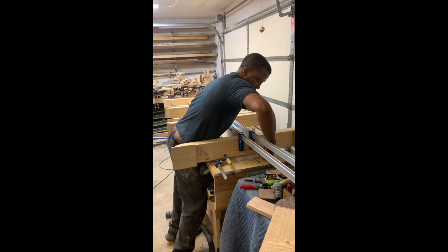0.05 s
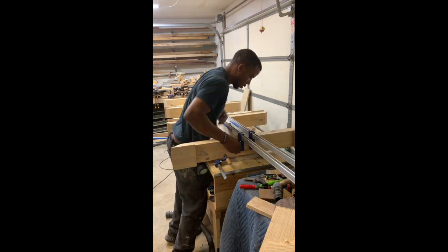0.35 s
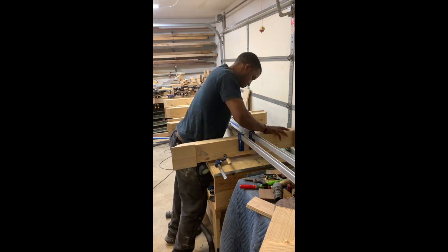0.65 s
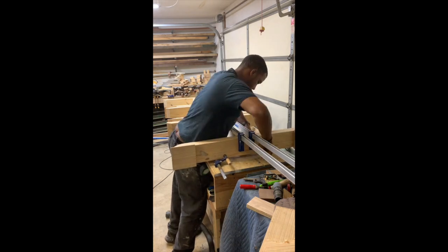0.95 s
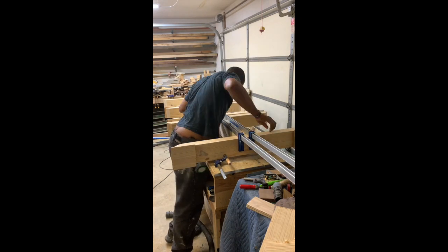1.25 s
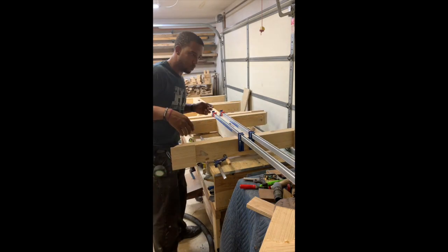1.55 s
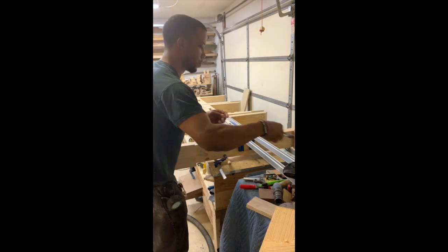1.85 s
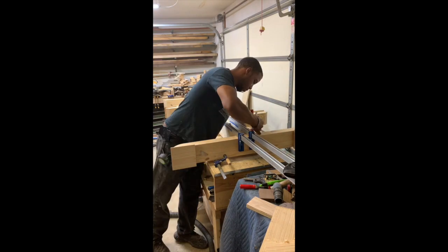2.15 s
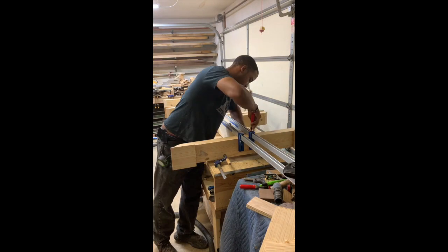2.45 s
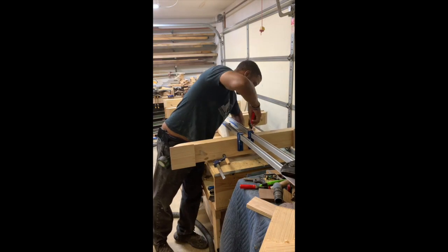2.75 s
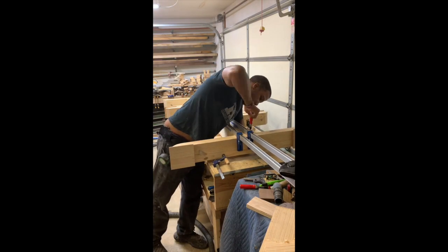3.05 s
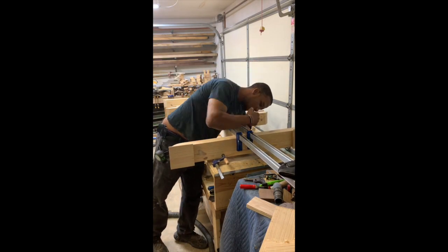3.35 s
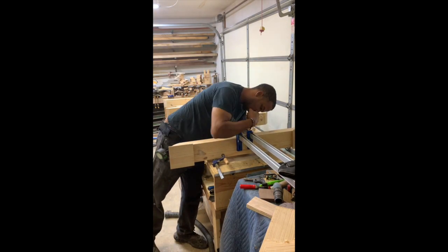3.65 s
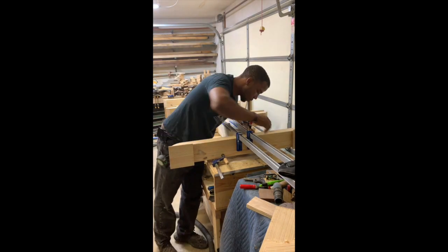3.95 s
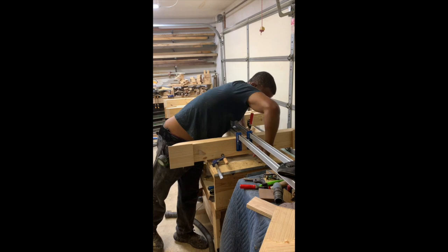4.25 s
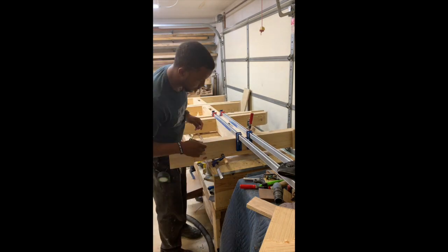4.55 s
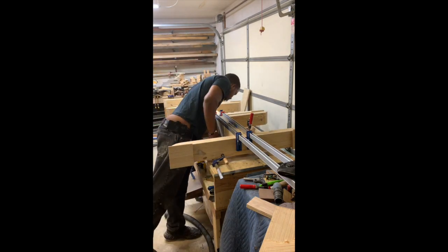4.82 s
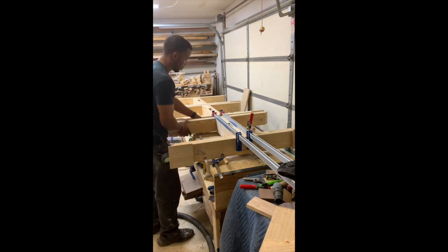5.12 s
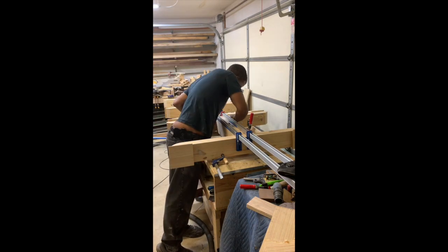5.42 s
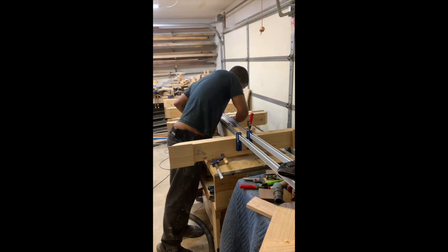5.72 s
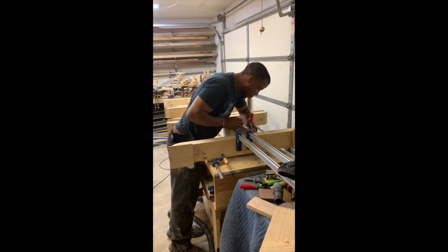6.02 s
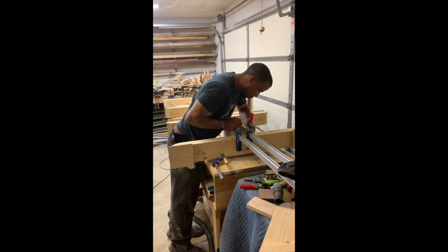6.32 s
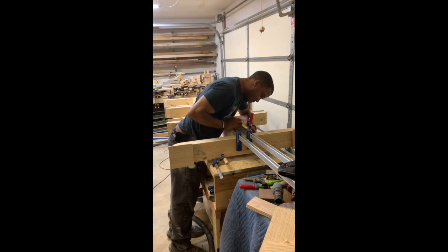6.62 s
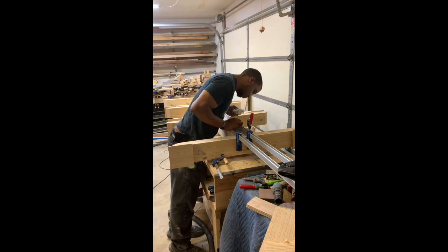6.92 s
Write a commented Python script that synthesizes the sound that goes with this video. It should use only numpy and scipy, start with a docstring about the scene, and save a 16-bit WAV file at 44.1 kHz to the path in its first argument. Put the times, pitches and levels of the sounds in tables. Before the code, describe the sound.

Bar clamps are worked on a wooden frame in a garage, heard from a fixed, nearly mono microphone over faint room air and a distant machine whine. A brief high screw squeal ends in a clack right at the start. A short scrape comes at 0.5 seconds, then scattered clinks and ticks. Around 1.8 seconds a jaw rattles, skids along its bar and bangs loudly onto the wood. Another sharp metal clack lands at 2.4 seconds. From there until 4.4, loaded threads creak and tick in short turns among ringing clicks. At 4.5 a dry screw squeals in rising strokes for about half a second, then sings in soft, broken squeaks until around 6, with a small scrape and knock at 5.4. Lighter clinks, faint squeaks and soft wooden taps continue to the end at about 7 seconds.

```python
"""A garage workshop, where bar clamps are hurriedly set and tightened on a wooden frame.
Jaws, bars and handles strike and ring, and a jaw skids along its bar and bangs onto the wood.
Loaded threads creak and tick; a dry screw sticks and slips, squealing hard or singing softly.
A machine whines faintly in the distance. The microphone stays in one spot, nearly mono."""
import sys
import numpy as np
from scipy import signal
from scipy.fft import rfft, irfft
from scipy.io import wavfile

SR = 44100
rng = np.random.default_rng(int(sys.argv[2]) if len(sys.argv) > 2 else 0)


def int16_out(signal):
    """Quantize to a 16-bit WAV file."""
    q = np.round(np.clip(np.atleast_2d(signal).T, -1, 1) * 32767)
    wavfile.write(sys.argv[1], SR, q.astype(np.int16))


N = 316638
TIME = np.arange(N) / SR
HIT_TIME = np.arange(SR // 16) / SR
SIDE = np.array([[1], [-1]])   # adds on the left, subtracts on the right


def from_db(db):
    """Decibels to gain."""
    return 10 ** (np.asarray(db) / 20)


def rms_one(x):
    """Scale to unit rms."""
    return x / np.sqrt(np.mean(x ** 2) + 1e-30)


def one_ms(x):
    """Scale to the energy of one millisecond at unit rms: the reference for a hit's level."""
    return x * np.sqrt(SR / 1000 / (np.sum(x ** 2) + 1e-30))


def curve(points, at=TIME):
    """Follow straight lines between (seconds, value) points."""
    return np.interp(at, *np.transpose(points))


def drift(per_s):
    """A random wander of unit rms."""
    knots = rng.standard_normal(int(N / SR * per_s) + 2)
    return rms_one(np.interp(TIME * per_s, np.arange(len(knots)), knots))


def gate(start, end, edge_s):
    """Attack, hold, release."""
    return np.clip(np.minimum(TIME - start, end - TIME) / edge_s, 0, 1)


def coloured(x, spectrum):
    """Give noise a spectrum of (Hz, dB) points."""
    hz, level_db = np.transpose(spectrum)
    bins = np.maximum(np.fft.rfftfreq(len(x), 1 / SR), 1)
    return irfft(rfft(x) * from_db(np.interp(np.log(bins), np.log(hz), level_db)), len(x))


def resonate(x, hz, width):
    """A resonance applied twice, so that its skirts are steep."""
    r = np.exp(-np.pi * width / SR)
    b = np.array([1, 0, -1]) * (1 - r * r) / 2
    a = [1, -2 * r * np.cos(2 * np.pi * hz / SR), r * r]
    return signal.lfilter(b, a, signal.lfilter(b, a, x + 1e-18))


def noisy_modes(modes, drive=1):
    """Ring each (Hz, width in Hz, dB) mode with its own noise, shaped by the drive."""
    return sum(from_db(db) * rms_one(resonate(drive * rng.standard_normal(N), hz, width))
               for hz, width, db in modes)


def add(track, s, sound):
    """Mix a sound into a track at a time."""
    start = int(max(s, 0) * SR)
    part = sound[:N - start]
    track[start:start + len(part)] += part


# Room tone around the microphone. Each row: frequency in Hz, relative density in dB.
AIR_SPECTRUM = [(30, -42.5), (100, -29.5), (250, -19), (400, -18), (520, -15), (620, -9.5), (760, -12.5),
                (900, -11.5), (1120, 6.5), (1550, -7.5), (2120, -4), (2700, -11.5), (5000, -22.5),
                (12000, -26.5)]
# Its rise and fall. Each row: time in seconds, level in dB before the trim.
AIR_LEVEL = [(0, -53), (.3, -60.5), (.85, -60.5), (1.5, -65), (1.9, -61.8), (4.2, -61), (4.7, -58),
             (5.1, -60.5), (5.95, -59.3), (6.15, -63), (6.8, -63.8), (7.18, -67.5)]
# The machine in the distance. Each row: resonance in Hz, width in Hz, level in dB before the trim.
MACHINE_MODES = [(428, 10, -88), (527.3, 78, -78.5), (754.3, 21, -78), (837.7, 30, -80), (1095, 76, -65),
                 (1185, 13, -60.5), (2074, 110, -64.5), (2355, 57, -69.5), (3060, 60, -79.5)]


def background(air_trim_db=-1.5, machine_trim_db=-3):
    """Room air and a distant machine's whine swell and sink together; the bass is a little wider."""
    level_db = curve(AIR_LEVEL)
    mid, side = (rms_one(coloured(rng.standard_normal(N), AIR_SPECTRUM)) for _ in range(2))
    side = coloured(side, [(250, -15), (700, -26)])
    air = from_db(level_db + air_trim_db) * (mid + side * SIDE)
    swell = from_db(level_db - np.median(level_db) + machine_trim_db)
    return air + swell * noisy_modes(MACHINE_MODES)


# What the garage throws back at the microphone. Each row: frequency in Hz, relative level in dB.
REFLECTION_SPECTRUM = [(100, -6.5), (1000, 0.5), (2000, 3.5), (5000, -0.5), (8000, -1.5), (12000, 1.5)]


def garage(direct, early_db=-16, early_t60_s=.07, late_db=-25, late_t60_s=.54, side_db=-18):
    """The direct sound, quick reflections off bench and timber, then a faint tail from the walls."""
    t = np.arange(SR) / SR
    onset = np.clip((t - .003) / .011, 0, 1)
    reflections = []
    for _ in range(2):
        response = 0
        for db, t60 in ((early_db, early_t60_s), (late_db, late_t60_s)):
            tail = coloured(rng.standard_normal(SR), REFLECTION_SPECTRUM)
            tail *= onset * from_db(-60 * t / t60)
            response += from_db(db) * tail / np.linalg.norm(tail)
        reflections.append(signal.fftconvolve(direct, response)[:N])
    mid, side = reflections
    return direct + mid + from_db(side_db) * side * SIDE


def catches(per_s, spread_db, max_spreads):
    """Friction catches and lets go at random: a train of uneven impulses."""
    caught = rng.random(N) < per_s / SR
    return caught * from_db(spread_db * np.minimum(rng.exponential(1, N), max_spreads))


def contact(chatter_ms, rise_ms, bite, grain_db=2.5):
    """A contact bites within a moment, then dies in a spray of tiny rebounds."""
    noise, size = rng.standard_normal((2, len(HIT_TIME)))
    ms = HIT_TIME * 1000
    envelope = (1 - np.exp(-ms / rise_ms)) * np.exp(-(ms / max(chatter_ms, .3)) ** .94)
    force = noise * from_db(grain_db * np.clip(size, -2, 2)) * envelope
    force[0] += bite
    return force


# The metal of a clamp on the bench. Each row: resonance in Hz, width in Hz, relative level in dB.
CLAMP_MODES = [(2101, 340, -0.5), (2348, 480, -7), (2889, 500, -3), (3767, 380, -4.5), (4230, 550, -2),
               (4670, 510, 1), (5136, 240, -0.5), (5480, 310, -2), (6055, 690, 0.5), (6676, 570, -2.5),
               (7754, 600, -3), (9536, 600, -1.5), (9950, 470, 1.5), (10700, 1000, 2), (11450, 600, -6)]


def rubbed_clamp(per_s, spread_db, tilt_db_per_octave, widen):
    """Tiny catches of metal on metal, each ringing the clamp; unit rms."""
    modes = [(hz, width * widen, db + tilt_db_per_octave * np.log2(hz / 5000))
             for hz, width, db in CLAMP_MODES]
    return rms_one(noisy_modes(modes, catches(per_s, spread_db, max_spreads=4)))


def struck_clamp(hits, bite=.9, mode_floor=1, ring_width_hz=330, rise_share=.2):
    """Each spot has its own ring; hard edges add treble, heavy blows the bar's low modes."""
    out = np.zeros(N)
    hz, width, mode_db = np.transpose(CLAMP_MODES)
    body, edge = hz < 3400, hz > 8600
    for s, db, body_db, edge_db, ring_hz, share, chatter_ms in hits:
        force = contact(1.05 * chatter_ms, rise_share * max(chatter_ms, .3), bite)
        near_ring = mode_floor + np.exp(-((hz - ring_hz) / 1100) ** 2)
        gains = near_ring * from_db(mode_db + rng.normal(0, 4, len(hz))) * rng.choice([-1, 1], len(hz))
        modes = np.array([g * one_ms(resonate(force, f, w)) for f, w, g in zip(hz, width, gains)])
        ring = np.sqrt(share) * one_ms(resonate(force, ring_hz, ring_width_hz))
        middle = np.sqrt(1 - share) * one_ms(modes[~body & ~edge].sum(0))
        low = from_db(body_db) * one_ms(modes[body].sum(0))
        high = from_db(edge_db) * one_ms(modes[edge].sum(0))
        add(out, s - .0006, from_db(db) * (low + one_ms(ring + middle) + high))
    return out


# Play in handles and bars, faint at the microphone. Each row: time in seconds, level in dB before trims.
LOOSE_PLAY = [(0, -47.5), (.32, -64.5), (.58, -58.5), (.9, -63.5), (1.3, -69.5), (2.05, -63), (3.3, -66),
              (3.95, -75.5), (4.25, -57), (4.55, -73), (5.07, -63), (5.3, -65.5), (5.82, -57),
              (6.15, -67.5), (6.55, -60), (7.05, -69)]


def loose_rustle(trim_db=-4.5):
    """Loose parts rub softly all through the work."""
    rub = rubbed_clamp(per_s=600, spread_db=.5, tilt_db_per_octave=-6.5, widen=.9)
    return from_db(curve(LOOSE_PLAY) + trim_db) * rub


def loose_hits(count=22, trim_db=5, spread_db=2.5, body_db=-10, edge_db=-1, share=.4, chatter_ms=2.5):
    """Hits for struck_clamp: loose parts touch at random, as hard as their play allows."""
    place, size, spot = rng.random((count, 3)).T
    starts = (np.arange(count) + place) / count * (N - 1) / SR
    levels = curve(LOOSE_PLAY, starts) + trim_db + spread_db * (2 * size - 1)
    rings_hz = 5000 * 2 ** ((spot - .5) / 2)
    return [(s, db, body_db, edge_db, hz, share, chatter_ms)
            for s, db, hz in zip(starts, levels, rings_hz)]


# Turns of a handle. Each row: start and end in seconds, level in dB before the trim.
HANDLE_TURNS = [(.85, 0.952, -56), (1.06, 1.23, -59), (2.423, 2.593, -60.5), (2.807, 2.97, -54),
                (3.103, 3.433, -53), (3.49, 3.85, -51.5), (4.104, 4.408, -53.5)]


def thread_creak(trim_db=-6.5, ease_s=.053, lurch_db=4):
    """Each turn takes up the load, moves in fits and lets off; uneven slips ring the screw."""
    screw_modes = [(2076, 220, -11), (4654, 300, -1.5), (5560, 260, -3.5),
                   (6065, 320, -7), (7980, 320, -13)]
    slips = catches(per_s=280, spread_db=4, max_spreads=3)
    load = sum(from_db(db + trim_db) * gate(start - ease_s / 2, end + ease_s / 2, ease_s)
               for start, end, db in HANDLE_TURNS)
    return load * from_db(lurch_db * drift(30)) * rms_one(noisy_modes(screw_modes, slips))


# Faint squeaks of the thread. Each row: start and end in seconds, first and last pitch in Hz, level in dB.
THREAD_SQUEAKS = [(1.318, 1.332, 3150, 3155, -51), (1.334, 1.358, 3100, 3180, -56),
                  (4.57, 4.661, 3950, 4270, -57.5), (4.631, 4.756, 4085, 4650, -56),
                  (4.658, 4.74, 5100, 5250, -62.5), (4.758, 4.873, 3610, 3960, -63),
                  (4.767, 4.839, 5420, 5530, -64.5), (4.769, 4.852, 3030, 3070, -78),
                  (5.737, 5.967, 3050, 3060, -69), (6.06, 6.092, 3010, 3100, -62)]


def thread_squeaks(jitter=.003, flutter_db=3):
    """Higher modes of the screw catch briefly and glide up as the pressure grows."""
    out = np.zeros(N)
    wobble = 1 + jitter * drift(400)
    flutter = from_db(flutter_db * drift(150))
    for start, end, start_hz, end_hz, db in THREAD_SQUEAKS:
        now = (TIME > start) & (TIME < end)
        along = (TIME[now] - start) / (end - start)
        hz = (start_hz + (end_hz - start_hz) * along) * wobble[now]
        tone = np.sqrt(2) * np.sin(2 * np.pi * np.cumsum(hz) / SR)
        out[now] += from_db(db) * np.sin(np.pi * along) * flutter[now] * tone
    return out


def stick_slip(hz, level, octave, jitter=.0041, flutter_db=1.64, rasp_db=-17.5):
    """Stick and slip lock into a thin tone with a fitful octave; uneven slips roughen it."""
    phase = 2 * np.pi * np.cumsum(hz * (1 + jitter * drift(220))) / SR
    fitful_octave = octave * from_db(3.5 * drift(45) - 2.5)
    tone = 0
    for harmonic, gain in ((1, level), (2, fitful_octave)):
        rasp = from_db(rasp_db) * harmonic ** 2 * (drift(330) + 1j * drift(330))
        tone += gain * np.real((1 + rasp) * np.exp(1j * harmonic * phase))
    return np.sqrt(2) * tone * from_db(flutter_db * drift(70) - 1.5)


def bar_buzz(level):
    """The squeal's friction also shakes the bar's lowest mode and its overtones."""
    friction = rng.standard_normal(N)
    return level * sum(from_db(db) * rms_one(resonate(friction, hz, width))
                       for hz, width, db in ((2120, 107, -12), (4410, 800, -29)))


# Hard strokes of the dry screw. Each row: start and end in seconds, first and last pitch in Hz
# before the sag, drive in dB, octave in relative dB.
HARD_STROKES = [(-.01, .088, 2185, 2130, -26.5, -28), (4.507, 4.656, 2122, 2690, -36.5, -17),
                (4.648, 4.887, 2130, 2451, -33.3, -19), (4.876, 4.936, 2110, 2150, -37, -27)]
# Gentle nudges. Each row: centre and half length in seconds, drive in dB, octave in relative dB.
GENTLE_NUDGES = [(3.292, 0.055, -56, -16), (4.941, .02, -50, -22.5), (5.098, 0.047, -49, -22.5),
                 (5.255, .04, -51, -22), (5.364, .04, -41, -24), (5.451, .03, -46.5, -5),
                 (5.551, .035, -50.5, -10), (5.68, 0.051, -41, -15), (5.82, 0.042, -58, 6),
                 (5.922, 0.077, -46.5, -18.5), (6.29, .04, -61, -14), (6.51, .1, -57, -10)]
# The note the nudges draw from the screw. Each row: time in seconds, pitch in Hz.
SINGING_PITCH = [(3.3, 2078), (4.95, 2139), (5.25, 2166), (5.47, 2216), (5.68, 2278), (5.83, 2313),
                 (5.92, 2270), (6.03, 2177), (6.3, 2115), (6.8, 2050)]


def dry_screw(choke_db=7, octave_growth_db=9.5, sag_s=.016, sag_share=.0904, flicker_db=2.4):
    """Hard strokes squeal and choke as pressure builds; gentle nudges swell into a soft singing."""
    hz = curve(SINGING_PITCH)
    level, octave = np.zeros((2, N))
    for start, end, start_hz, end_hz, db, octave_db in HARD_STROKES:
        along = np.clip((TIME - start) / (end - start), 0, 1)
        stroke = from_db(db - choke_db * along ** 4) * gate(start, end, edge_s=.012)
        glide = start_hz + (end_hz - start_hz) * along
        sag = 1 - sag_share * np.clip(1 - (end - TIME) / sag_s, 0, 1)   # the hand lets go
        hz = np.where(stroke > level, glide * sag, hz)
        level = np.maximum(level, stroke)
        octave += from_db(octave_db + octave_growth_db * (along - .5)) * stroke
    flicker = from_db(flicker_db * drift(45))   # under a light load the tone keeps half breaking off
    for s, half_s, db, octave_db in GENTLE_NUDGES:
        swell = flicker * from_db(db) * np.exp(-np.minimum(((TIME - s) / half_s) ** 2, 20))
        level += swell
        octave += from_db(octave_db) * swell
    return stick_slip(hz, level, octave) + bar_buzz(level)


# A loaded thread jumping forward. Each row: start in seconds, level in dB, bar body in relative dB,
# ring in Hz, that ring's share from 0 to 1.
THREAD_JUMPS = [(0.934, -33, -18, 4740, 0.9), (1.064, -42.5, -8, 5300, 0.7), (1.132, -34.5, -22, 5390, 1),
                (1.1887, -22, -35, 5350, 0.96), (1.2, -38, -16, 5390, 0.9), (1.2329, -41, -18, 5280, .85),
                (2.4585, -37.5, 2.5, 5000, .2), (2.516, -42.5, 8, 5300, .45), (2.5297, -35.5, -5, 5300, .5),
                (2.546, -37.5, -4, 5130, .1), (2.553, -32, -23, 3880, .8), (2.567, -33.5, -11, 4290, 0.4),
                (2.589, -43, -10, 5480, 1), (2.6854, -36, -4, 5020, 0.2), (2.726, -46, -1, 4400, 0.25),
                (2.8938, -36, -16, 5460, 0.93), (2.9073, -43, -6, 5530, .65), (2.928, -45, -17, 4080, .5),
                (3.1197, -37.5, -9.5, 5720, .55), (3.1362, -43, 0, 5680, .7), (3.1887, -37.5, -5, 5660, .7),
                (3.243, -46, 3.5, 5320, 0.4), (3.275, -40.5, -13.5, 4670, .5), (3.3026, -40, 0, 5800, .35),
                (3.311, -33, -7, 4540, 0.58), (3.3525, -41, -9, 4620, .4), (3.4131, -37, -15, 4600, .6),
                (3.5074, -26, -23, 4640, 0.45), (3.535, -31, -23, 4700, 0.1), (3.6063, -30, -35, 4450, .4),
                (3.6207, -39, -14, 4460, .75), (3.698, -30, -28, 4640, .5), (3.7035, -25, -31, 5640, 0.1),
                (3.742, -41, -19, 4600, .5), (3.7895, -27, -21, 4610, 0.38), (3.8432, -26, -35, 4580, 0.47),
                (4.1012, -32.5, -23, 5050, 0.53), (4.1328, -35, -24, 5080, 0.8),
                (4.167, -31.5, -32, 5380, .5), (4.2385, -35, -14, 5640, 0.4), (4.2714, -37, -11, 5160, 0.8),
                (4.3102, -41, -16, 7520, 0.23), (5.187, -38, -10, 5250, .65)]


def thread_ticks(edge_db=-57, chatter_ms=1.9):
    """Short jumps start softly and ring the clamp; their faint hard edge does not grow with size."""
    hits = [(s, db, body_db, edge_db - db, hz, share, chatter_ms)
            for s, db, body_db, hz, share in THREAD_JUMPS]
    return struck_clamp(hits, bite=.3, mode_floor=.8, ring_width_hz=260, rise_share=.5)


# Skids along a bar. Each row: fastest moment in seconds, level in dB, seconds to rise and to fall 20 dB.
JAW_SKIDS = [(.089, -35.5, 0.03, 0.0238), (.471, -32, .019, .033), (1.72, -41, 0.0356, 0.03),
             (1.81, -25, .04, 0.0456), (1.88, -49.5, 0.08, 0.1), (5.408, -41.5, .012, 0.0369)]


def jaw_skids():
    """A jaw gathers speed and stops, scraping all the clamp's resonances."""
    speed = 0
    for s, db, rise_s, fall_s in JAW_SKIDS:
        drop_db = 20 * np.maximum((s - TIME) / rise_s, (TIME - s) / fall_s).clip(0, 10)
        speed += from_db(db - drop_db)
    return speed * rubbed_clamp(per_s=1100, spread_db=1, tilt_db_per_octave=1.5, widen=2.9)


# The wooden frame. Each row: resonance in Hz, width in Hz, relative level in dB.
FRAME_MODES = [(825, 140, 1.5), (1189, 150, 4.5), (1262, 120, 1)]
# Blows that reach it. Each row: start in seconds, wood level in dB, lowest mode in relative dB,
# bench thump in dB.
FRAME_BLOWS = [(0.09, -27, -33, -75), (0.454, -67, -6, -66), (.472, -45, -5, -64), (1.713, -47, -8, -66),
               (1.795, -29, -5, -51), (1.8048, -28, -1, -32.5), (1.8175, -14.5, -3.5, -44),
               (1.925, -49.5, 3, -64), (2.047, -53.5, -4, -64), (2.807, -37, -22.5, -75),
               (4.476, -51, -11, -73.5), (5.400, -58, -7, -60), (5.409, -44.5, -9.5, -67.5),
               (6.06, -44.5, -1.5, -66.5), (6.075, -46.5, 0, -73.5), (6.87, -53.5, -6.5, -74)]


def frame_knocks(thump_hz=380):
    """The timber answers with a short hollow note, the bench with a dull push."""
    timber, bench = np.zeros((2, N))
    push = signal.sosfilt(signal.butter(2, thump_hz, fs=SR, output="sos"), np.exp(-HIT_TIME / .0003))
    for s, wood_db, lowest_db, thump_db in FRAME_BLOWS:
        force = contact(chatter_ms=.93, rise_ms=.3, bite=.88)
        lowest, *upper = [from_db(db) * one_ms(resonate(force, hz, width))
                          for hz, width, db in FRAME_MODES]
        wood = from_db(lowest_db) * lowest + sum(upper)
        add(timber, s - .001, from_db(wood_db) * one_ms(wood))
        add(bench, s - .001, from_db(thump_db) * one_ms(push))
    return timber, bench


# Metal on metal, loudest at the microphone. Each row: start in seconds, level in dB, bar body and hard
# edge in relative dB, ring in Hz, that ring's share from 0 to 1, rough chatter time in milliseconds.
CLAMP_STRIKES = [(.0887, -20.5, -4.5, -15, 4500, 0.08, 2.5), (.156, -47, -8, -4.5, 5200, .2, 6.3),
                 (.205, -46, -15, -15, 4230, .15, 3.8), (.426, -32, -22, 4, 5570, .9, 1.3),
                 (.472, -25.5, -23, 0, 4340, .3, 2.5), (.5982, -51, 0, 3, 4520, 0.7, 1.1),
                 (.824, -25.5, -6.5, -8, 7960, .2, 0.85), (.8693, -47, -3, 7, 5240, .8, 1.4),
                 (.9125, -46.5, -6, 7, 4720, .6, 1.4), (.9835, -35.5, -22, 11, 5760, 0.97, .4),
                 (1.0736, -35.5, -19, -8.5, 5430, 0.44, 2.4), (1.2919, -49, -6, 6, 4270, .4, 8),
                 (1.5355, -39, -11.5, 0, 4900, .5, 3.6), (1.6534, -32.5, -9.5, -4, 5300, .2, 2),
                 (1.713, -26, -9.5, -1.5, 4630, 0.75, 3.7), (1.7488, -27, -13, 2.5, 4330, .3, 4.5),
                 (1.7643, -22, -17, -0.5, 5300, .2, 3.1), (1.7824, -19, -20, -3, 4400, 0.8, 5.1),
                 (1.7935, -8.5, -12.5, -11.5, 4950, .3, 2.1), (1.8103, -22, 0, 7, 5500, 0.2, 5.5),
                 (1.8172, -8, -2.5, 1, 4230, .58, 1.66), (1.9254, -27, -7.5, 2.5, 6350, .05, 3.1),
                 (1.9453, -32.5, -7.5, -7, 5120, 0.1, 0.77), (2.009, -60.5, -8, 16, 4670, .2, 1.8),
                 (2.0465, -36.5, 6, -0.5, 5020, 0.5, 2.2), (2.062, -46, -8, 0.5, 5020, .05, 4.4),
                 (2.243, -36.5, -13, -2, 5230, .25, 4.5), (2.311, -38, -15.5, -7, 4710, 1, 1.5),
                 (2.398, -31.5, -10.5, 0.5, 4980, 0.4, 2.9), (2.4143, -29.5, -10, -18, 5830, .05, 2.2),
                 (2.4273, -8, -12.5, -12.5, 4990, 0.04, 1.87), (2.6741, -22.5, -6, -32, 5140, 0.03, 2),
                 (2.8066, -27.5, -1, -8, 4500, 0, 2.3), (3.0307, -44, -22.5, -2, 5940, .3, 4.6),
                 (3.0447, -24.5, -21, -2, 6100, .3, 1), (3.0485, -23.5, -21, -1, 6170, 0.2, 2.4),
                 (3.4002, -30.5, -16, -7, 5620, .35, 4), (3.5885, -31.5, -21, 0, 5480, 0.44, 1.1),
                 (3.667, -29.5, -30, 2.5, 7600, 0.67, 0.63), (3.7106, -28, -29, -6.5, 5580, .6, 3),
                 (4.0475, -43, -18, -9.5, 5130, 0.22, 5), (4.3848, -41, -23, -3.5, 4370, 0.45, 1.9),
                 (4.4624, -39.5, -10, -9, 5300, .05, 3.3), (4.4768, -28, -5.5, -4.5, 6200, .05, 2.35),
                 (5.2228, -43, -8.5, -7.5, 5460, 0.77, 7), (5.347, -48.5, -12, 5.5, 6110, .15, 4),
                 (5.4003, -35.5, -18.5, 2.5, 4390, .45, 1.5), (5.4107, -26.5, -4.5, -2, 4330, 0.2, 2.8),
                 (5.5598, -46.5, -14, 4, 6200, 0.54, 1.5), (5.657, -31.5, -14, -6, 5520, 0.4, 1.7),
                 (5.7332, -31.5, -24, -7.5, 6200, .3, 1.9), (5.8243, -29.5, -19, -4.5, 6070, 0.21, 1.7),
                 (6.0191, -38, -19, 0, 7000, 0.22, 2.3), (6.0445, -47, -10.5, 3.5, 5000, .05, 2.7),
                 (6.2585, -52, -6, 0.5, 4490, .65, 4), (6.3683, -53.5, -11, 8.5, 4200, .65, 2.1),
                 (6.4835, -45, -7, -1.5, 4210, 0.29, 5.8), (6.581, -57, -16.5, 10.5, 5150, 0.1, 7),
                 (6.6968, -52, -2, 3.5, 4330, .9, 4), (6.7428, -54.5, -4, 13, 4990, 0.2, 1.9),
                 (6.766, -35, -22, -15, 4286, 1, 1.8), (6.865, -48, -10, 1, 5070, .25, 7.8),
                 (6.884, -44, -14, 0, 4970, .7, 2.2), (6.9455, -60, -13, 15.5, 5600, .25, 2.3)]


def clamp_clinks():
    """Jaws, bars and handles strike and ring, with faint touches of loose parts in between."""
    return struck_clamp(list(CLAMP_STRIKES) + loose_hits())


def scene(thump_left_share=.2):
    """The clamp work in the garage; the bench thumps a little to the left of the microphone."""
    wood, thump = frame_knocks()
    friction = loose_rustle() + thread_creak() + jaw_skids() + dry_screw() + thread_squeaks()
    metal = clamp_clinks() + thread_ticks()
    return garage(metal + wood + thump + friction) + thump_left_share * thump * SIDE + background()


def record(dry, ceiling=.75, cutoff_hz=11780):
    """After the microphone, any peak over the ceiling is flattened and the top is cut steeply."""
    lowpass = signal.ellip(5, .15, 42, cutoff_hz, fs=SR, output="sos")
    return signal.sosfiltfilt(lowpass, np.clip(dry, -ceiling, ceiling))


dry = scene()
out = record(dry)
int16_out(out)
```